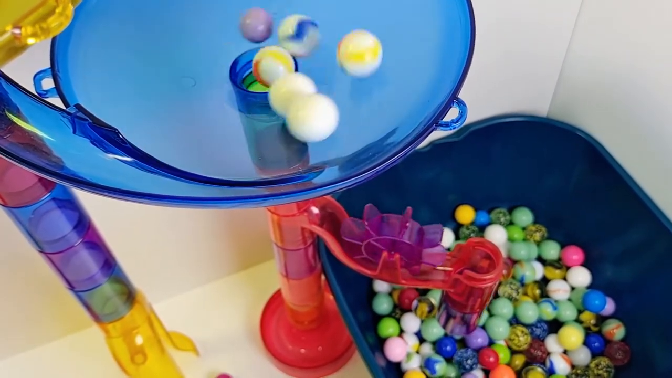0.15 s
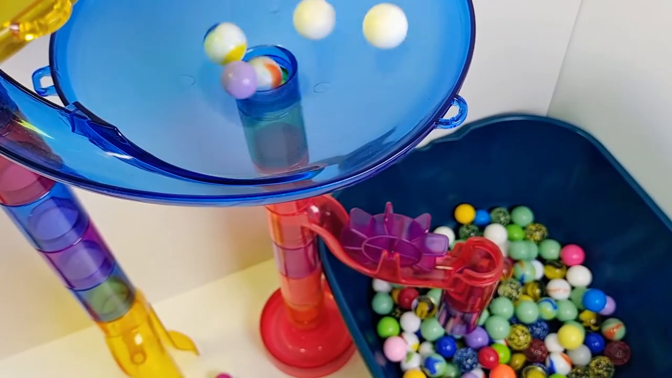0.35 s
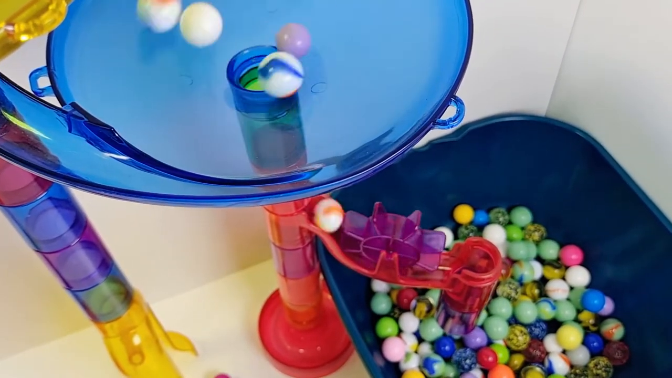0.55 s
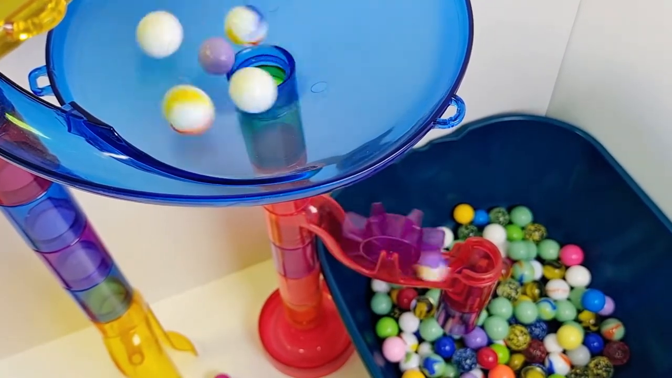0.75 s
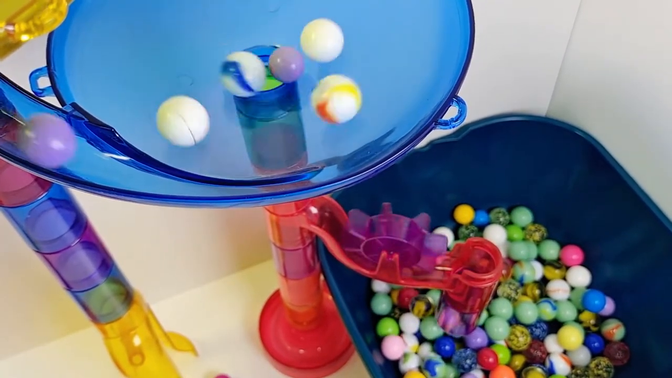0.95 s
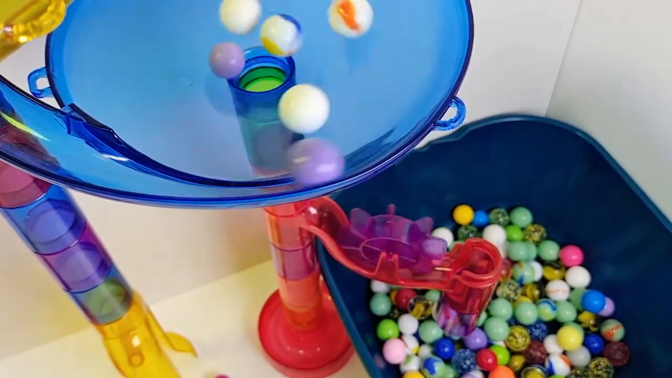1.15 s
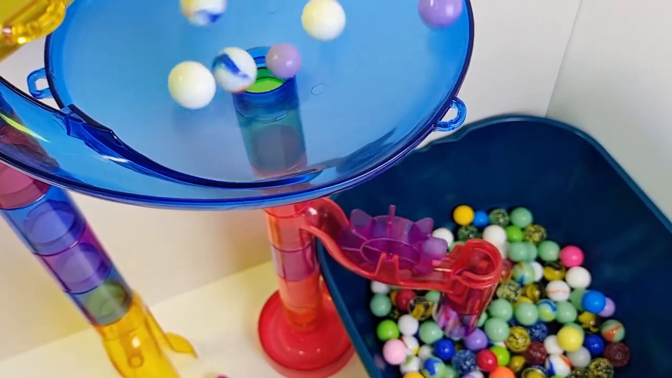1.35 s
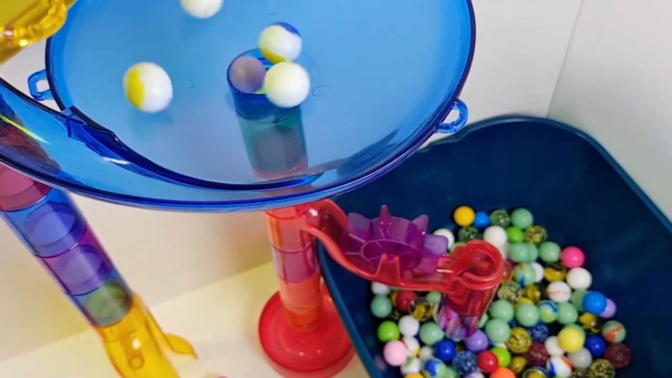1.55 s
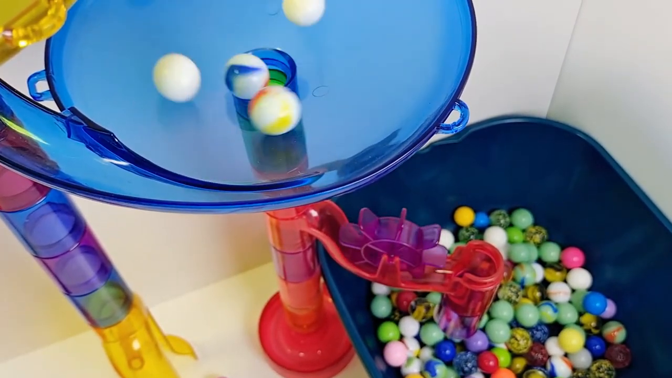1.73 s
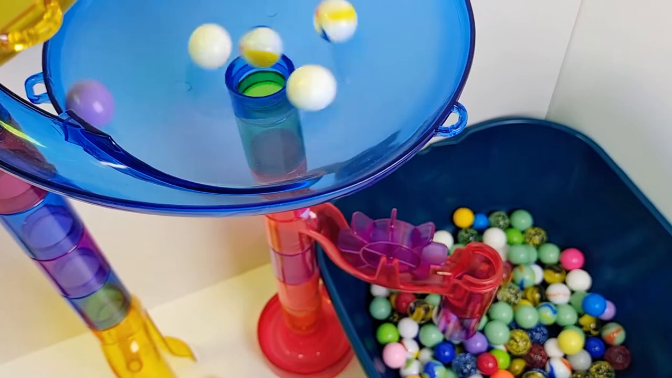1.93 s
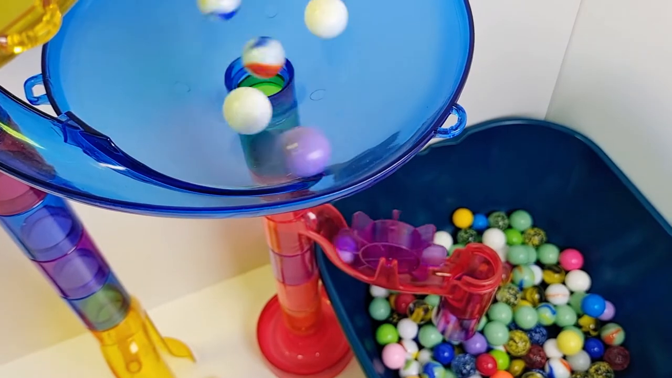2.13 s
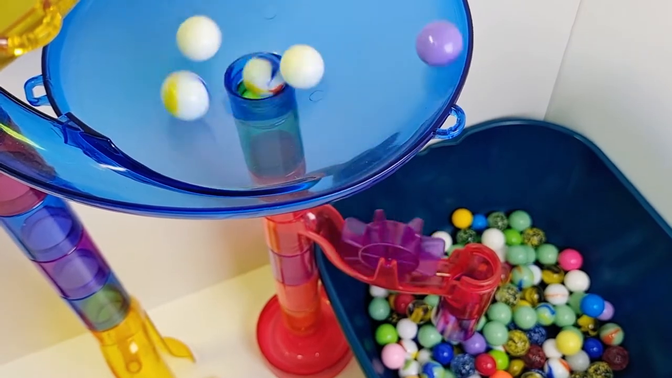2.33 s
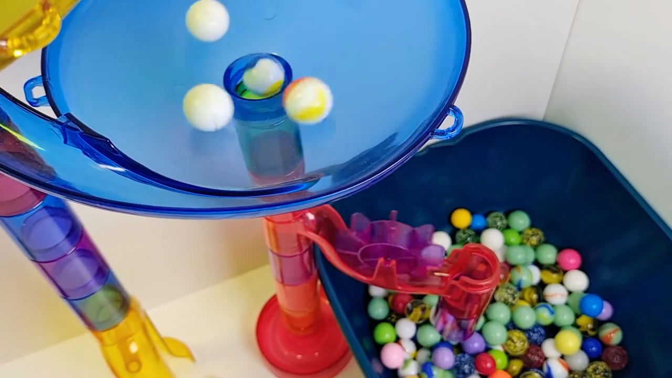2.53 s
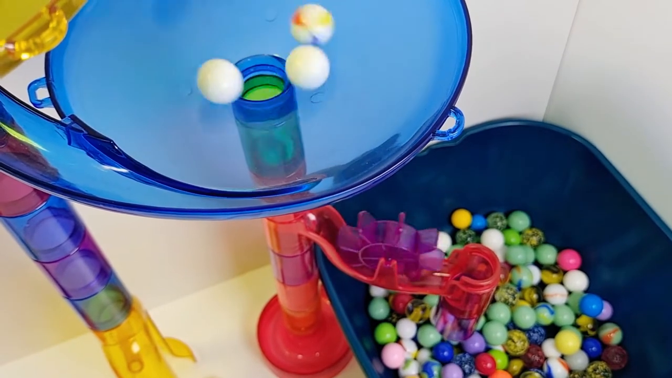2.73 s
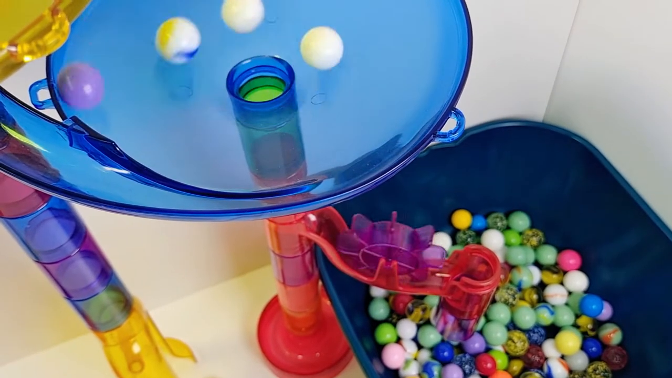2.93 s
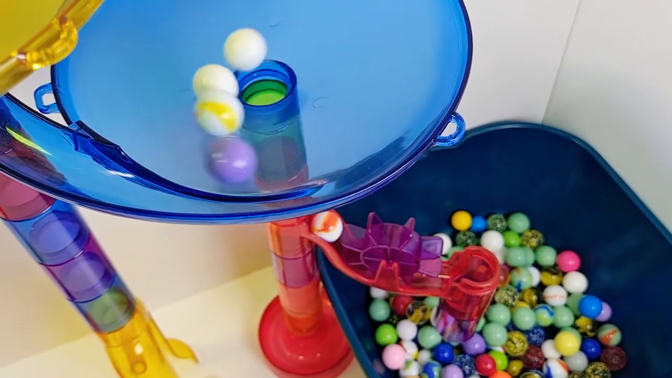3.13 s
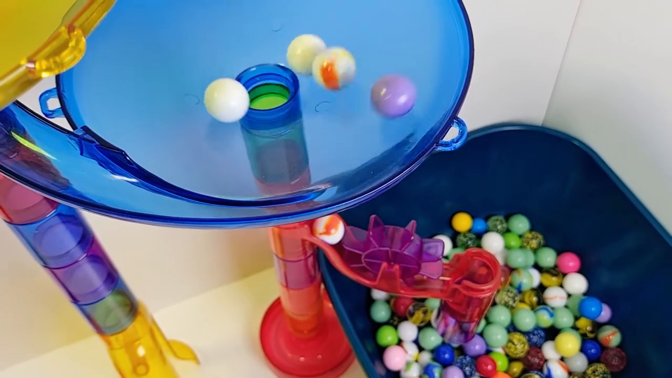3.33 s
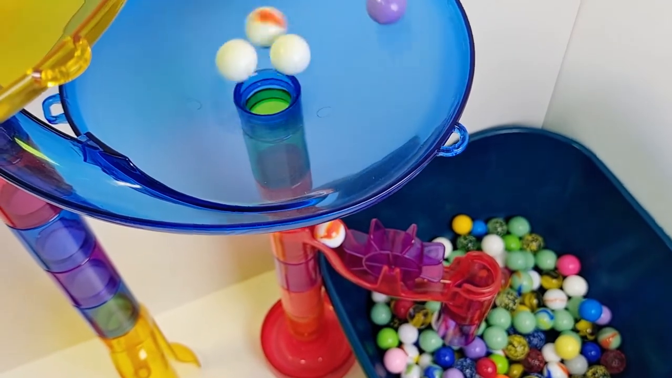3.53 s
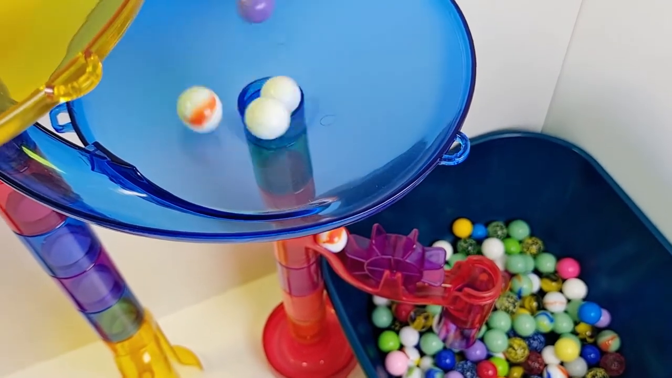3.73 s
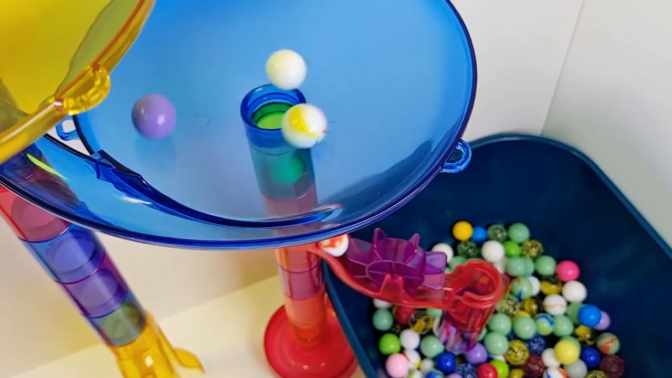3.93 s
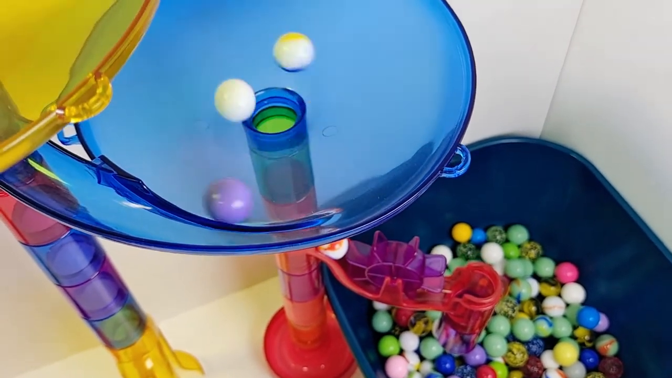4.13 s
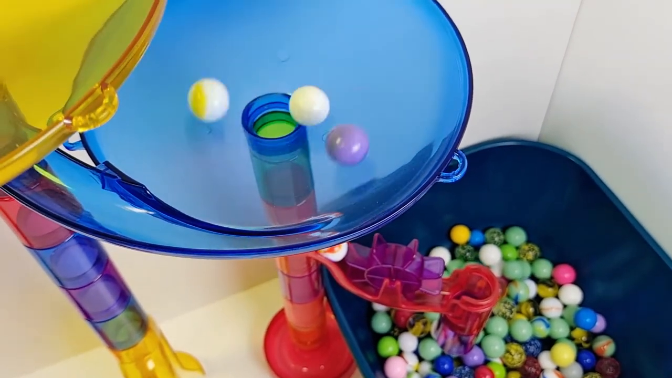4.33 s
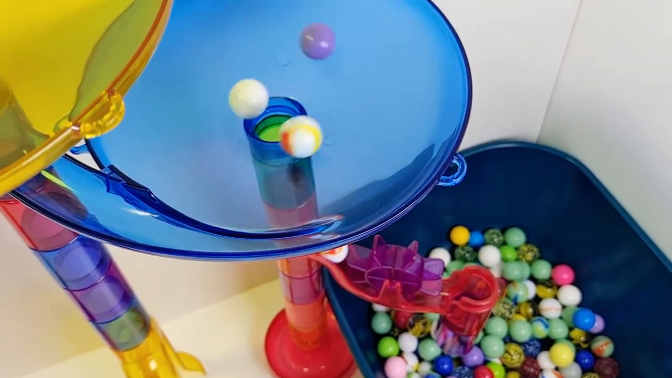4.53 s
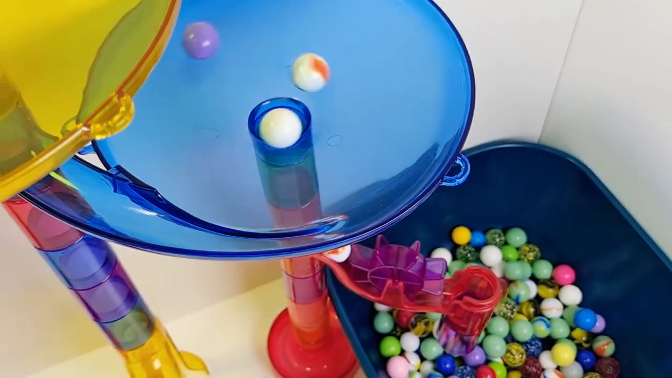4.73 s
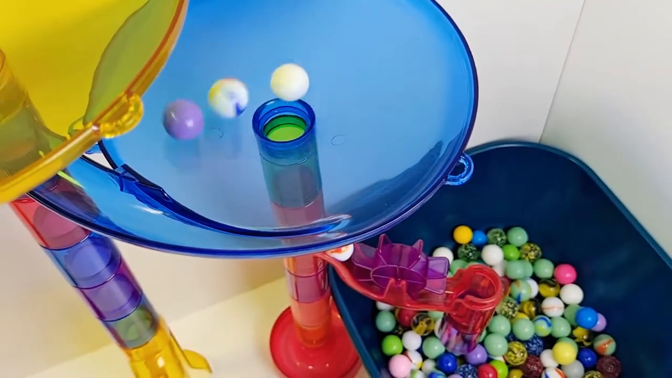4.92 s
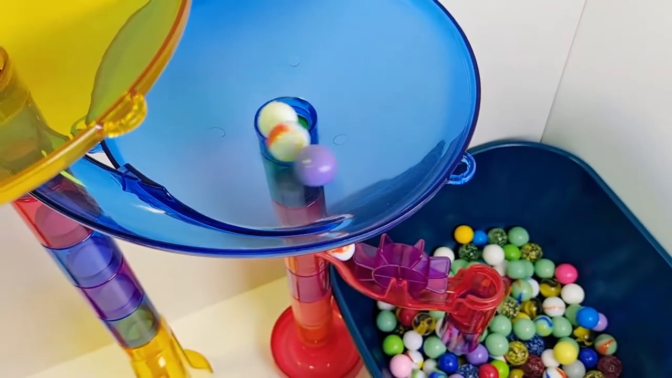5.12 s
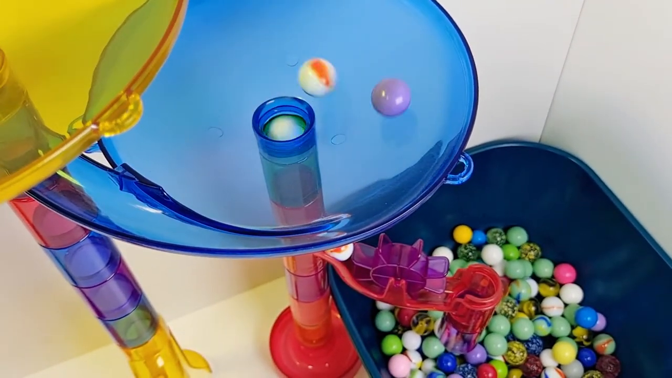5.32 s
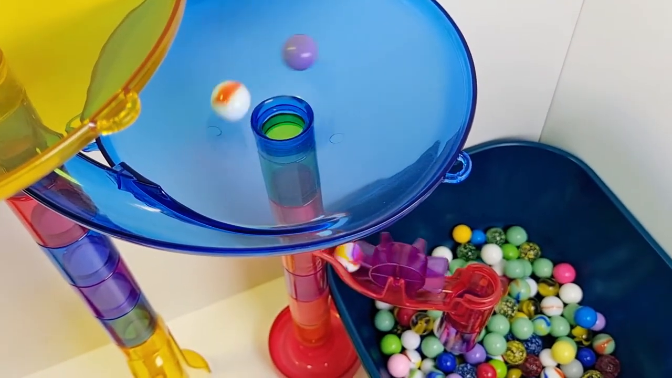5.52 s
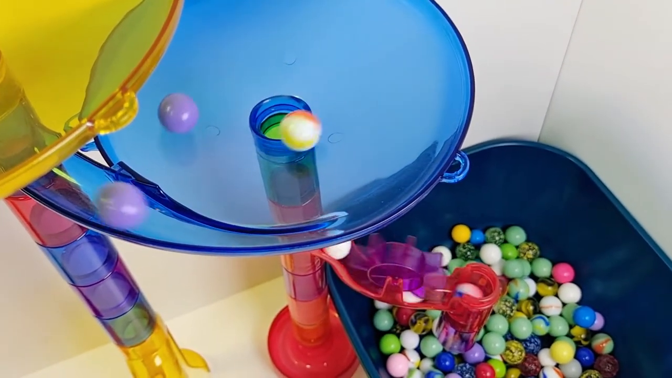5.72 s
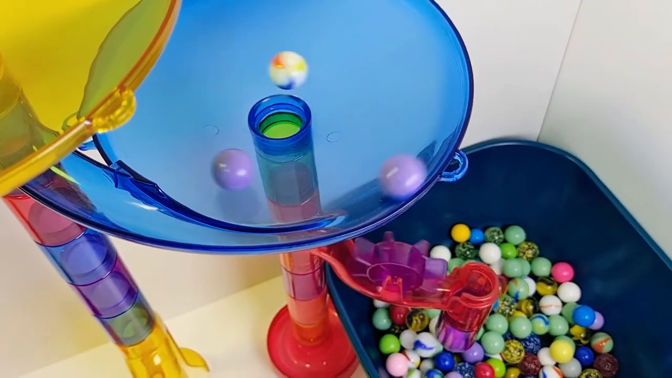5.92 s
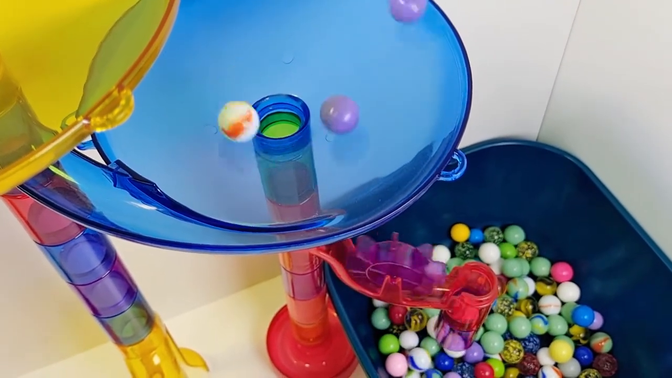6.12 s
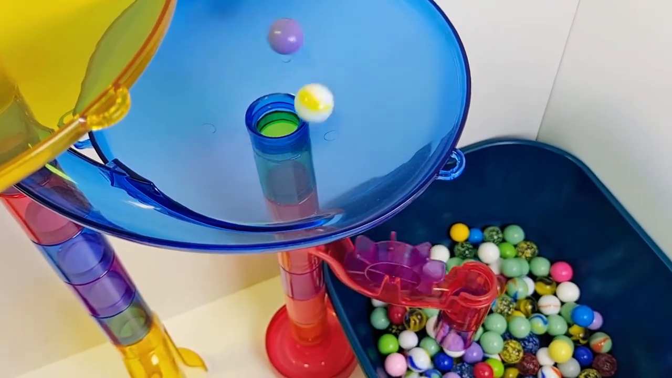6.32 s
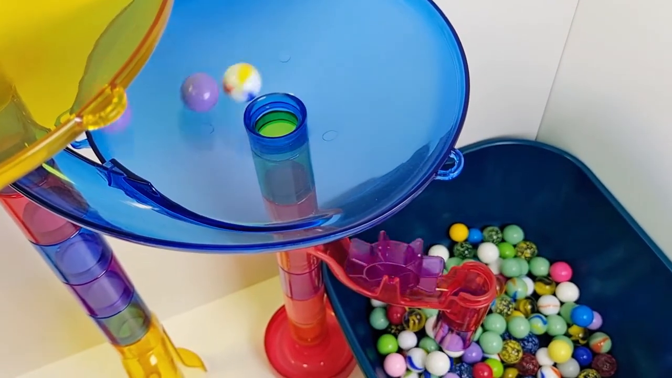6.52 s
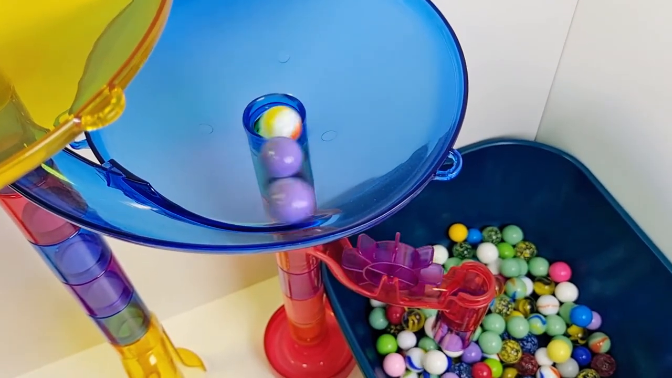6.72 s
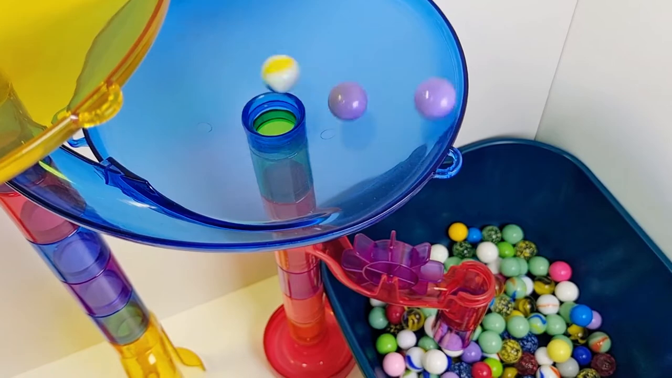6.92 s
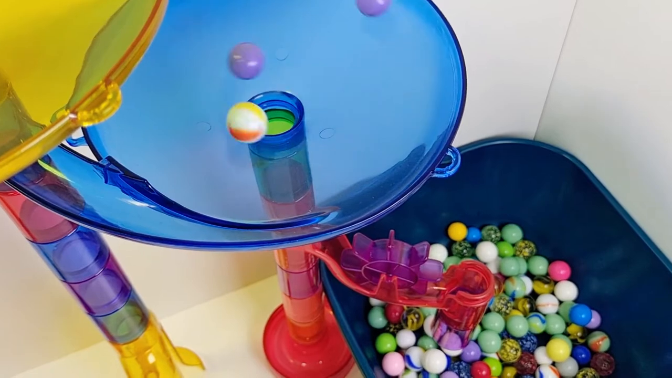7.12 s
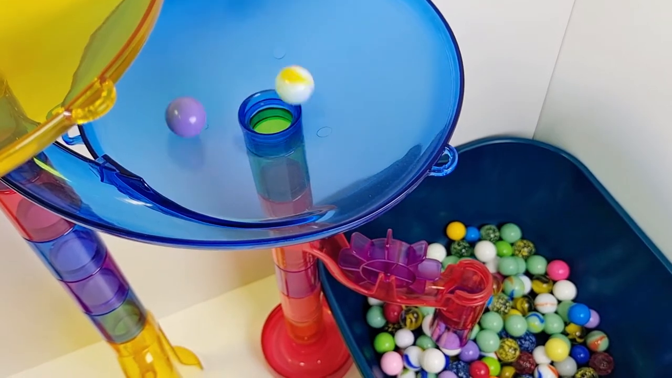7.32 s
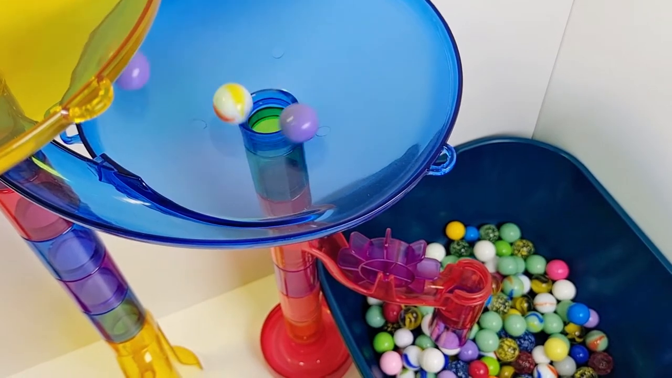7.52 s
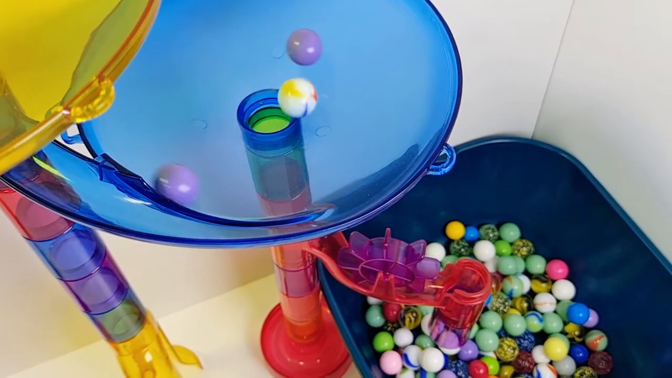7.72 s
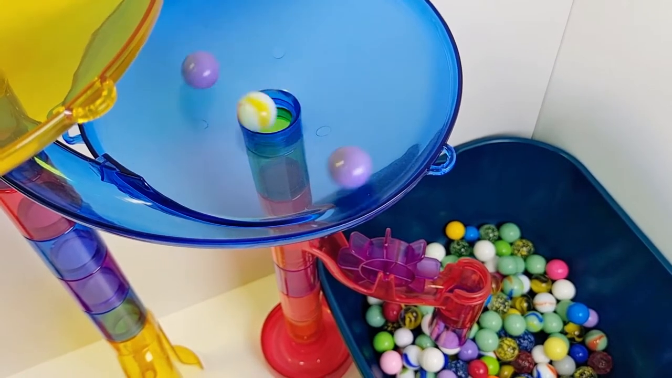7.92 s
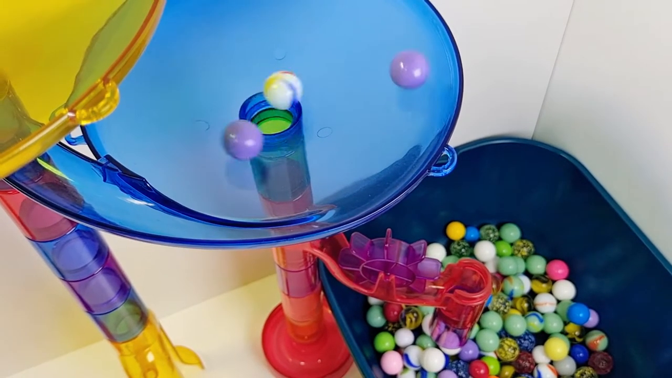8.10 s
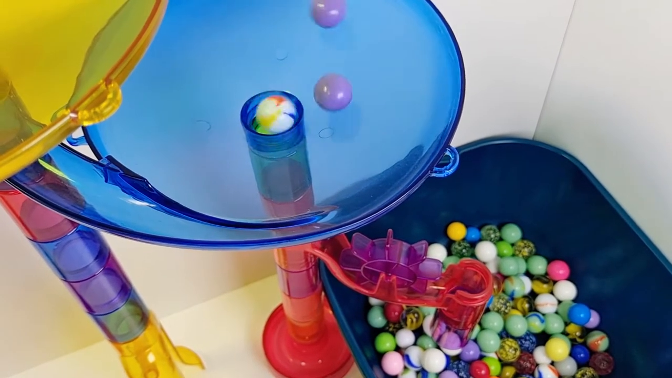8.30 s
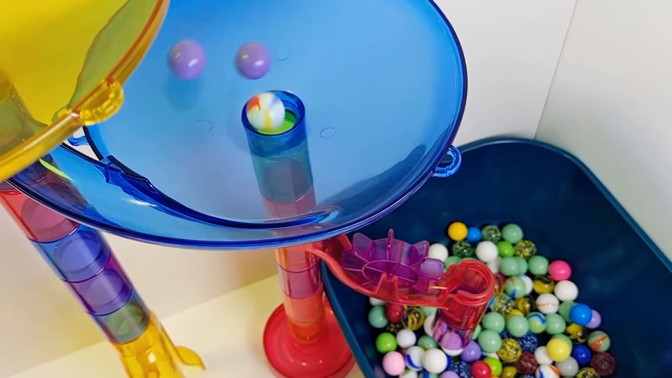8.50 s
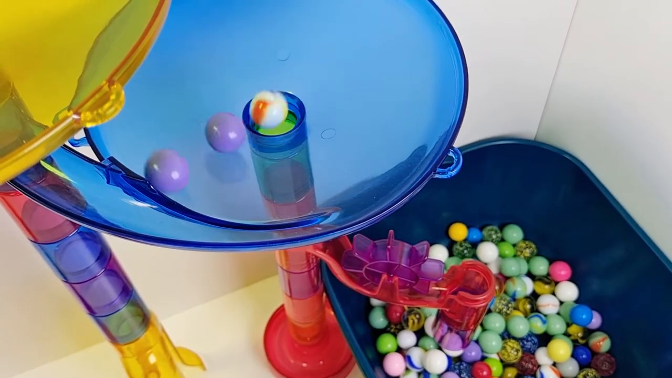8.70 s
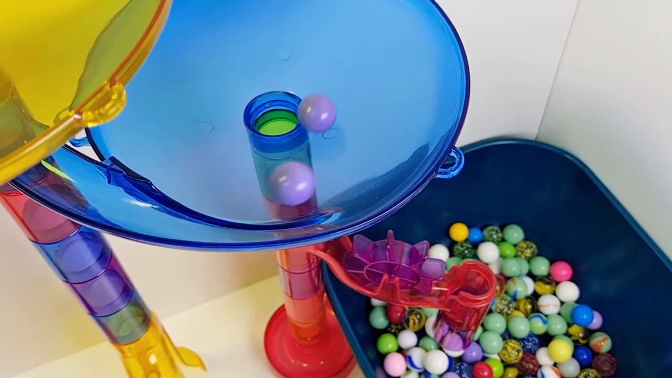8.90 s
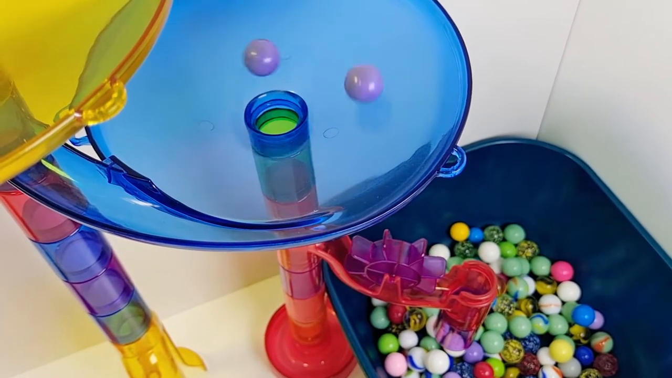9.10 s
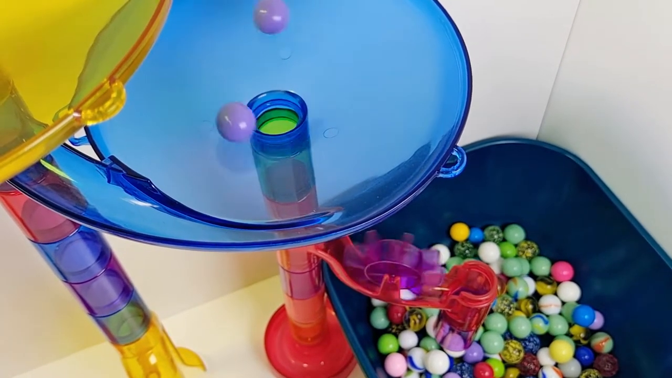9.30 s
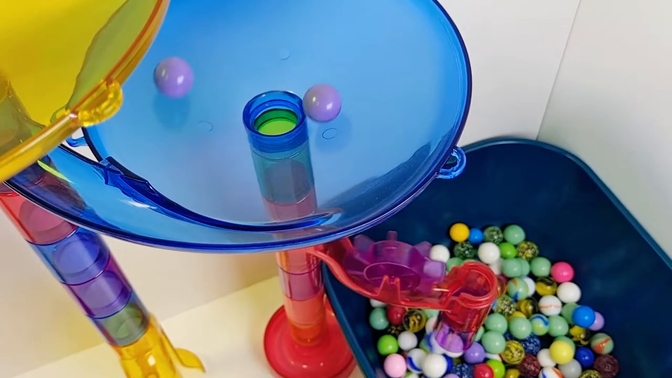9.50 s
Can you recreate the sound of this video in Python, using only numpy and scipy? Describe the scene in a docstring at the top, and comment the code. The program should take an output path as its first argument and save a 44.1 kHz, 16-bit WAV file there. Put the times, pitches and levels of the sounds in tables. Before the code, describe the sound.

Close, wide stereo in a small quiet room. Glass marbles roll continuously round thin plastic funnels, a hollow grainy whirr with a light scrape, wavering in level. At about 0.5 s one drops: quick hard clacks down the tube and track, landing in the tub of marbles near 1.1 s. Rolling continues, then a second rattle at 1.9-2.2 s and a solid landing at 2.6 s. At 2.9-3.3 s comes a heavier hollow clatter with a low tower boom. Small knocks follow around 4.1-4.3 s. From 5.5 to 6.4 s a longer run knocks along the track, clinks, and lands in several clacks. From 6.6 to 8.3 s mostly soft rolling with faint nudges; a slight drone spins at 8.4-8.8 s. At 9.0-9.4 s a last sharp drop booms, rattles and settles among glass, with rolling still going afterwards.

```python
"""A small room: glass marbles circle in the plastic funnels of a marble run, close by.
They rattle down tubes, knock on track and ramp, and drop into a tub of marbles.
Rolling is dense random contacts through funnel resonances; the tower booms softly under it.
Each blow is damped modes over short coloured noise; glass clicks are high resonant noise."""
import sys
import numpy as np
from scipy import signal
from scipy.fft import rfft, irfft, next_fast_len
from scipy.io import wavfile
from scipy.ndimage import map_coordinates

SR = 44100
rng = np.random.default_rng(int(sys.argv[2]) if len(sys.argv) > 2 else 0)


def int16_out(signal):
    """Quantize to a 16-bit WAV file."""
    q = np.round(np.clip(np.atleast_2d(signal).T, -1, 1) * 32767)
    wavfile.write(sys.argv[1], SR, q.astype(np.int16))


N = 421155

# Marbles circling. Each row: time in seconds, funnel rolling level in dB, treble scrape level in dB,
# both before the layer gains.
CIRCLING = [(0, -39, -50), (0.3, -35.5, -47), (0.45, -31, -41.5), (1.27, -38, -55), (1.68, -35.5, -63),
            (1.83, -36.5, -48.5), (2.2, -35.5, -54), (2.43, -32, -53), (2.76, -36, -53),
            (3.42, -41.5, -56.5), (3.72, -40.5, -67), (3.95, -40.5, -48.5), (4.2, -39, -45),
            (4.47, -39, -57), (4.72, -42.5, -64.5), (4.99, -36.5, -54), (5.05, -44.5, -63),
            (5.1, -37.5, -52), (5.17, -40.5, -58.5), (5.36, -38.5, -45), (5.7, -31.5, -37.5),
            (6.27, -39, -56), (6.62, -36, -58), (6.92, -39.5, -62), (7.2, -41.5, -67), (7.33, -37, -63.5),
            (7.48, -42, -68.5), (7.75, -38.5, -63), (8.08, -38.5, -58.5), (8.22, -43.5, -64),
            (8.3, -38.5, -57), (8.52, -34, -56.5), (8.78, -39, -62), (8.93, -30.5, -47.5),
            (9.55, -37.5, -47.5)]
# Marbles leave the funnel and run down the track. Each row: start in seconds, spin-up time in seconds,
# run length in seconds, rattle level in dB, funnel shaking level in dB, both before the layer gains.
RUNS = [(0.57, 0.021, 0.24, -30, -37.5), (1.95, 0.053, 0.16, -40.5, -49.5), (2.891, 0.46, 0.31, -38, -37.5),
        (4.08, 0.19, .25, -45, -53), (5.58, 0.14, .42, -38, -48.5), (6.332, 0.29, 0.23, -46, -59.5),
        (9.059, 0.069, .17, -33.5, -36)]
# Tower boom. Each row: time in seconds, level in dB.
BOOM_LEVEL = [(0, -51), (.3, -49.5), (.52, -34), (.8, -36), (.92, -46.5), (1.85, -52), (1.97, -38.5),
              (2.3, -53), (2.57, -42), (2.72, -44.5), (2.95, -30.5), (3.27, -40.5), (3.42, -53),
              (3.76, -60), (4.17, -39), (4.55, -61), (5.3, -53.5), (5.5, -39), (6.03, -42.5), (6.25, -48.5),
              (6.9, -56), (8.1, -59), (8.55, -46.5), (8.87, -56), (9.07, -30.5), (9.27, -32), (9.55, -51)]

# Blows: levels are before the register trims.
# Marble on track. Each row: start in seconds, level in dB, ring in Hz, clack in dB re the level.
KNOCKS = [(0.094, -36.5, 1490, -2.5), (0.1908, -21, 1390, -15.5), (0.5007, -20.5, 1420, -15),
          (0.516, -24.5, 1410, -10.5), (0.548, -18.5, 1620, -28.5), (0.5716, -7, 1630, -17.5),
          (0.6949, -11.5, 1470, -16.5), (0.7305, -26, 1900, -8), (0.7746, -9.5, 1410, -11),
          (0.815, -19, 1390, -13.5), (0.8512, -20.5, 1560, -17.5), (0.947, -9, 2170, -12),
          (1.0093, -22, 1445, -16), (1.7939, -31, 1640, -10), (1.881, -29, 1620, -6),
          (1.9217, -24, 1910, -15), (2.0038, -13, 1550, -11), (2.085, -15, 1582, -12),
          (2.1386, -19, 1573, -14.5), (2.191, -36.5, 1400, -6), (2.2197, -23, 1740, -14),
          (2.6786, -19.5, 1600, -8), (2.7694, -20.5, 1580, -19), (2.815, -33, 1800, -10),
          (2.8402, -29, 1860, -8), (3.25, -14, 1580, -12.5), (3.8723, -35.5, 1590, -12),
          (3.9733, -38.5, 1380, 2.5), (4.038, -38.5, 1630, 2.5), (4.0695, -19.5, 1294, -9),
          (4.079, -14.5, 1710, -11), (4.1361, -25, 1550, -11), (4.1712, -16, 1450, -12.5),
          (4.1864, -14, 1285, -12.5), (4.2064, -22, 1850, -4.5), (4.271, -22, 1400, -13),
          (4.3039, -21, 1350, -11), (4.318, -36, 1590, -1), (4.347, -21.5, 1350, -15),
          (5.3097, -32, 1680, -9), (5.3989, -25.5, 1570, -16), (5.5442, -39, 1770, -17.5),
          (5.5685, -12, 1600, -8.5), (5.63, -25, 1400, -6), (5.6476, -18.5, 2270, -7.5),
          (5.673, -14, 1590, -11.5), (5.6885, -17, 1740, -8), (5.7169, -14, 1400, -10),
          (5.751, -14, 1430, -13), (5.7727, -24.5, 1450, -6.5), (5.8458, -23, 1360, -3),
          (5.874, -9, 2290, -11.5), (5.8907, -17.5, 1280, -6.5), (5.948, -26.5, 1320, 3),
          (6.3394, -10, 1355, -13.5), (6.4797, -30.5, 1360, -5), (6.581, -24, 1420, -15.5),
          (7.1182, -26, 1420, -21.5), (7.703, -33, 1560, -19), (7.733, -36, 1410, -15),
          (7.9245, -51, 1690, 2.5), (9.006, -22, 1650, -16), (9.032, -36, 1760, -18),
          (9.146, -12.5, 1410, -17), (9.238, -18.5, 1575, -21), (9.306, -23, 1330, -34)]
# Circling marbles jostle softly in the funnel. Each row: start in seconds, level in dB.
NUDGES = [(0.324, -23.5), (3.5669, -29), (5.085, -38), (6.83, -30), (6.9721, -30.5), (6.976, -23.5),
          (7.0059, -29.5), (7.7966, -29), (7.8133, -26.5), (8.2581, -35), (8.304, -27), (8.8945, -24.5)]
# Marble on a stiff rim or neck. Each row: start in seconds, level in dB, ring in Hz.
CLINKS = [(0.562, -23, 4340), (0.6214, -19, 5850), (0.6853, -26, 4680), (0.7414, -19, 5660),
          (0.8044, -27, 3310), (2.0972, -22, 3850), (2.4756, -13.5, 3950), (2.5166, -26, 3950),
          (2.735, -30.5, 4270), (4.086, -25, 3790), (4.1792, -18, 3100), (4.3764, -36.5, 2710),
          (4.667, -44, 3860), (5.5204, -24, 3850), (5.8974, -21.5, 3540), (6.0354, -21.5, 2680),
          (6.0454, -19.5, 4370), (6.1417, -26.5, 4460), (6.234, -19.5, 4230), (6.2484, -28, 3840),
          (6.2608, -26.5, 3880), (9.1044, -20, 3090), (9.1692, -24, 5000)]
# Falling marble on the inside of a tube. Each row: start in seconds, level in dB, clack in dB re the level.
TUBE_HITS = [(0.592, -7, -23), (1.9063, -18.5, -11), (1.943, -18, -7), (1.9472, -8, -11.5),
             (1.9587, -11, -8), (2.8695, -15, -24), (2.889, -9.5, -26), (2.8996, -11, -15.5),
             (2.921, -7, -22), (2.9269, -0.5, -17), (2.937, -3.5, -17), (5.5014, -10.5, -11.5),
             (5.5076, -14, -13.5), (9.0512, -4.5, -22.5), (9.06, -9.5, -19), (9.0982, -5, -18)]
# Marble out of a tube onto the ramp. Each row: start in seconds, level in dB, clack in dB re the level.
RAMP_HITS = [(0.613, -10, -18), (0.635, -7, -17), (2.9624, -4.5, -20.5), (3.0654, -5.5, -19),
             (3.1381, -6.5, -19), (3.1917, -15.5, -38), (3.2184, -17, -24), (4.2535, -15.5, -12),
             (9.1212, -3.5, -18), (9.208, -6, -20), (9.257, -13, -19)]
# Marble on marble. Each row: start in seconds, level in dB, ring in Hz.
CLICKS = [(0.7204, -28.5, 9500), (2.2215, -45, 10800), (2.297, -35, 10200), (3.1385, -31, 14000),
          (5.236, -47, 12000), (5.476, -43, 15000), (5.7735, -29, 8500), (9.06, -23, 7750),
          (9.359, -27, 12400), (9.3734, -26.5, 8900), (9.208, -34, 14000), (8.306, -57, 12300),
          (5.368, -50, 14500), (5.5, -47, 12500)]
# Marble into the tub. Each row: start in seconds, level in dB, ring in Hz, then thud, clack and
# bass thump, each in dB re the level.
DROPS = [(1.057, -7.5, 780, -11, -13.5, -38), (1.0932, -11.5, 790, -14, -23, -37),
         (1.116, -24, 806, -13, -23, -50), (2.5827, -4, 615, -30, -17.5, -49),
         (5.9804, -9.5, 774, -16, -11, -29), (6.0182, -10.5, 753, -17, -20.5, -36),
         (6.08, -12, 814, -21, -13.5, -63), (6.0984, -12.5, 665, -11, -29, -50),
         (6.4248, -11.5, 825, -4.5, -23, -48), (9.358, -23.5, 700, -22, -10.5, -65),
         (9.395, -13.5, 727, -21, -18.5, -33), (9.4164, -18, 692, -11.5, -41, -45)]

# Modes of the track. Each row: frequency in Hz, relative level in dB, t60 in seconds.
TRACK_MODES = [(378, -4, 0.032), (496, -13, 0.047), (680, -2.5, 0.041), (857, -7.5, 0.046),
               (901.6, -3, 0.09), (1028, -15.5, 0.15), (1304, -4.5, 0.064), (1403, 1.5, 0.04),
               (1601, -3.5, 0.084), (1858, 3.5, 0.049), (2255, -17.5, 0.2), (2710, -10, 0.058),
               (3272, -4.5, 0.04), (3910, -2.5, 0.027), (4750, -4.5, 0.034), (5830, -4, 0.034)]
# Modes of the ramp. Each row: frequency in Hz, relative level in dB, t60 in seconds.
RAMP_MODES = [(379, 0.5, 0.083), (860, -2, 0.061), (915, 2.5, 0.048), (1635, 6.5, 0.07), (2376, -2, .04),
              (2690, 4.5, .045), (3430, 8, 0.036), (3590, -0.5, 0.023), (5730, 5.5, .03)]
# Modes of the tub. Each row: frequency in Hz, relative level in dB, t60 in seconds.
TUB_MODES = [(287, -2, 0.045), (378, -1.5, 0.047), (510, 2, 0.053), (600, -3.5, 0.085), (760, -6, 0.093),
             (1226, -1.5, 0.051), (1403, -3.5, 0.047), (1840, -3, 0.036), (2830, -6, 0.032)]
# Resonances of the funnel. Each row: frequency in Hz, width in Hz, relative level in dB.
FUNNEL = [(711, 50, -11), (896.5, 63, -5), (986, 17, -11), (1313, 75, -2.5), (1400, 116, -0.5),
          (1633.5, 57, 0.5), (2276, 29, -15.5)]
# Resonances of the tower. Each row: frequency in Hz, width in Hz, relative level in dB.
TOWER = [(88, 34, -11), (117.8, 13, 1), (161.2, 22, 3.5), (178.6, 60, -8.5)]
# Resonances of the neck's lip. Each row: frequency in Hz, width in Hz, relative level in dB.
LIP = [(891, 63, 1), (1770, 220, -6), (2260, 240, -9.5), (2705, 160, -20)]

# Spectrum of the rolling on the wall. Each row: frequency in Hz, relative level in dB.
ROLL = [(110, -35.5), (180, -8.5), (250, -19), (382, -9.5), (624, -10), (712, -3.5), (798, -11),
        (895, -6.5), (1160, -8.5), (1420, -1.5), (1750, -4), (2000, -11.5), (2300, -17), (2750, -28.5),
        (4000, -35), (9000, -67.5)]
# Spectrum of the treble scrape. Each row: frequency in Hz, relative level in dB.
SCRAPE = [(1500, -4.5), (2700, 2.5), (3100, -4.5), (3600, 1), (4500, -4.5), (5600, -9.5), (8000, -17),
          (10000, -30.5), (14000, -20.5), (16000, -25.5)]
# Spectrum of the rattle and the jostling heap. Each row: frequency in Hz, relative level in dB.
RATTLE = [(50, -58.5), (350, 1.5), (800, 5.5), (1700, 7), (2400, 4.5), (4000, -2), (6000, -7),
          (8000, -11.5), (10000, -22.5), (13000, -19), (16000, -22.5)]
# Blow register, low body. Each row: frequency in Hz, relative level in dB.
THUD = [(20, -100), (50, -63), (100, -39.5), (200, -10.5), (450, -9), (850, 2), (1100, -11.5),
        (1400, -42.5)]
# Blow register, ringing plastic. Each row: frequency in Hz, relative level in dB.
SHELL = [(850, -20.5), (1150, -1.5), (1400, 3.5), (1800, 2), (2300, 5), (3000, -24)]
# Blow register, hard contact. Each row: frequency in Hz, relative level in dB.
CLACK = [(1700, -26), (2400, -7), (3900, -1.5), (5500, -5), (7500, -12.5), (10000, -35.5)]
# Blow register, glass treble. Each row: frequency in Hz, relative level in dB.
TICK = [(5500, -3), (8000, 6), (10000, -0.5), (12500, 6), (15500, 6)]
# Spectrum of the still air. Each row: frequency in Hz, relative level in dB.
HUSH = [(20, -49), (50, 24), (120, 4.5), (400, -14.5), (2000, -29.5), (8000, -45), (16000, -35.5)]
# Stereo likeness. Each row: frequency in Hz, left-right likeness from 0 to 1.
ALIKE = [(100, 0.99), (180, 1), (280, 0.8), (400, 0.86), (520, 0.64), (720, 0.24), (850, 1), (950, .1),
         (1500, 0.21), (4000, 0.04), (12000, 0.15)]
# Room decay. Each row: frequency in Hz, t60 in seconds.
ROOM_T60 = [(150, 0.17), (400, 0.59), (1000, 0.27), (3000, 0.18), (7000, 0.16), (15000, 0.15)]

TOP_HZ = 16050
HIT = SR // 8  # samples per blow
CRACK_DB, CRACK_S = 0, .0025  # extra gain at the instant of contact, and its decay constant
TICK_GROWS = 1.108  # dB of tick per dB of clack
GLINT_LO_HZ, GLINT_HI_HZ, GLINT_DB = 2300, 8000, -2.5  # high modes of the thin walls
CHATTER_S, GLINT_T60_S = .002, .028  # mean delay of the tiny rebounds, t60 of their rings
GLIDE = .021  # scale of the pitch bend, as a share
SPIN_UP_DB, SAG_DB_PER_S, RELEASE_DB_PER_S = 9, 7.5, 104  # rise over the spin-up, slow loss, final extra loss
SHAKE_RISE_DB_PER_S, SHAKE_FALL_DB_PER_S = 69, 62.5
NUDGE_HZ, RAMP_HZ = 1406, 1368
TUBE_HZ, TUBE_SCATTER_HZ = 1785, 40
SPIN_S, SPIN_END_S, SPIN_FADE_S, SPIN_DB = 8.36, 8.8, 0.068, -44


def amp(db):
    """Decibels to gain."""
    return 10 ** (np.asarray(db) / 20)


def unit(x):
    """x at rms 1."""
    return x / np.sqrt(np.mean(x ** 2) + 1e-20)


def along(points, hz):
    """(Hz, value) points read on a log frequency axis."""
    f, v = np.transpose(points)
    return np.interp(np.log(hz + 1), np.log(f), v)


def wobble(rate_hz):
    """Smooth random curve, rate_hz knots a second."""
    knots = rng.standard_normal(int(N * rate_hz / SR) + 4)
    coarse = np.arange(0, N + 64, 64)
    return np.interp(np.arange(N), coarse, map_coordinates(knots, [coarse * rate_hz / SR]))


def filtered(x, response):
    """x times a response of frequency."""
    n = x.shape[-1]
    m = next_fast_len(n + 8192)
    return irfft(rfft(x, m) * response(np.fft.rfftfreq(m, 1 / SR)), m)[..., :n]


def coloured(x, spectrum):
    """x shaped by a (Hz, dB) spectrum, at rms 1."""
    return unit(filtered(x, lambda hz: amp(along(spectrum, hz))))


def resonating(x, peaks):
    """x through (Hz, width Hz, dB) resonances, squared for steep skirts, at rms 1."""
    def response(f):
        total = 0
        for centre, width, db in peaks:
            damping = 1j * f * width
            total = total + amp(db) * (damping / (centre * centre - f * f + damping)) ** 2
        return total
    return unit(filtered(x, response))


def spread(pair):
    """Two unrelated signals become left and right with the ALIKE likeness."""
    def mid_side(hz):
        turn = np.arccos(np.clip(along(ALIKE, hz), -1, 1)) / 2
        return np.array([np.cos(turn), np.sin(turn)])
    mid, side = filtered(pair, mid_side)
    return np.array([mid + side, mid - side])


def add(out, s, x):
    """Mix x into out from time s."""
    part = out[:, round(s * SR):][:, :x.shape[1]]
    part += x[:, :part.shape[1]]


def bumps(rate_hz, scatter_db, t60_s):
    """Tiny contacts at random times and of random sizes, each a decaying noise burst."""
    sizes = (rng.random(N) < rate_hz / SR) * amp(scatter_db * np.clip(rng.standard_normal(N), -2, 2))
    decay = amp(-60 * np.arange(HIT) / SR / t60_s)
    power = signal.fftconvolve(sizes ** 2, decay ** 2)[:N]
    return spread(np.sqrt(np.abs(power)) * rng.standard_normal((2, N)))


def partials(hz, db, t60_s, delay_s):
    """One damped sine per entry, with a phase offset between left and right."""
    t = np.maximum(np.arange(int(.8 * t60_s * SR)) / SR - delay_s[:, None], 0)
    phase = rng.uniform(0, 2 * np.pi, (len(hz), 1)) + rng.standard_normal((2, len(hz), 1))
    envelope = amp(db[:, None] - 60 * t / t60_s) * (1 - np.exp(-t / .0002))
    return envelope * np.sin(2 * np.pi * hz[:, None] * t + phase)


def pings(rate_hz, range_db, lo_hz, hi_hz, t60_s, count=6):
    """Separate small contacts at random times, each ringing count modes of its own; rms 1."""
    draws = rng.random((int(rate_hz * N / SR), 2 + count))  # columns: time, size, modes
    hz = lo_hz * (hi_hz / lo_hz) ** draws[:, 2:].ravel()
    db = np.repeat(-range_db * draws[:, 1], count)
    rings = partials(hz, db, t60_s, np.zeros(1))
    starts = np.repeat(draws[:, 0] * N, count).astype(int)
    at = starts[:, None] + np.arange(rings.shape[2])
    return unit(np.array([np.bincount(at.ravel(), side.ravel(), N)[:N] for side in rings]))


def glints(spectrum, count=8):
    """A marble chatters for an instant as it strikes; each touch rings another high mode."""
    position = (np.arange(count) + rng.random(count)) / count
    hz = GLINT_LO_HZ * (GLINT_HI_HZ / GLINT_LO_HZ) ** position
    db = GLINT_DB + along(spectrum, hz) + 3 * rng.standard_normal(count)
    return partials(hz, db, GLINT_T60_S, rng.exponential(CHATTER_S, count)).sum(axis=1)


def contact(s, level_db, ring_hz, clack_db, thud_db, tick_db):
    """One blow with its register levels: a harder contact has more clack, and tick follows clack."""
    return s, level_db, ring_hz, thud_db, clack_db, tick_db + TICK_GROWS * clack_db


def blows(hits, modes, ring_db, ring_t60_s, modal_db, vary_db, attack_s, trims_db, t60s_s):
    """Each blow rings clear modes over a noise crowd of short ones, in four separately levelled registers."""
    out, t = np.zeros((2, N)), np.arange(HIT) / SR
    attack = (1 - np.exp(-t / attack_s)) * (1 + amp(CRACK_DB) * np.exp(-t / CRACK_S))
    pan_db = 0.4 + 0.68 * rng.standard_normal(len(hits))  # left minus right: each lands elsewhere
    for register, spectrum in enumerate([THUD, SHELL, CLACK, TICK]):
        crowd = coloured(spread(rng.standard_normal((2, SR + HIT))), spectrum)
        for number, (s, level_db, ring_hz, thud_db, clack_db, tick_db) in enumerate(hits):
            hz, db, life_s = np.transpose([*modes, (ring_hz, ring_db, ring_t60_s)])
            db = modal_db + db + along(spectrum, hz) + vary_db * rng.standard_normal(len(hz))
            phase = rng.uniform(0, 2 * np.pi, len(hz)) + rng.normal(0, 0.48, (2, len(hz)))
            blow = crowd[:, rng.integers(SR):][:, :HIT] * amp(-60 * t / t60s_s[register])
            for k in np.flatnonzero(along(spectrum, hz) > -15):
                sine = np.sin(2 * np.pi * hz[k] * t + phase[:, k, None])
                blow = blow + amp(db[k] - 60 * t / life_s[k]) * sine
            if spectrum is CLACK:
                add(blow, 0, glints(spectrum))
            blow = blow * attack * amp(pan_db[number] * np.array([[.5], [-.5]]))
            strength = np.sqrt(np.mean(blow[:, :SR // 50] ** 2))  # rms of the first 20 ms
            gain_db = level_db + trims_db[register] + (thud_db, 0, clack_db, tick_db)[register]
            add(out, s, blow / strength * amp(gain_db))
    return out


def circling_db():
    """Level of the funnel rolling at each sample."""
    s, level_db, _ = np.transpose(CIRCLING)
    return np.interp(np.arange(N) / SR, s, level_db)


def gliding(x):
    """x with its pitch bending slowly, as the marbles' weight moves round the wall."""
    n = np.arange(N)
    bent = n + np.cumsum(GLIDE * wobble(5))
    return np.array([np.interp(bent % N, n, side) for side in x])


def rolling(shaking):
    """Marbles ride over tiny bumps that ring the funnel, louder while a run shakes it."""
    level = np.hypot(amp(circling_db()), amp(2.5) * shaking)
    wall = coloured(bumps(rate_hz=450, scatter_db=6.5, t60_s=0.055), ROLL)
    contacts = bumps(rate_hz=900, scatter_db=6.5, t60_s=0.0032)
    ring = np.zeros((2, N))
    for hz, width_hz, db in FUNNEL:
        # circling marbles cross each mode's nodes: its level wanders on its own
        mode_gain = amp(db + 2.1 * wobble(6))
        ring += mode_gain * gliding(resonating(contacts, [(hz, width_hz, 0)]))
    body = amp(-0.16) * level * unit(wall + amp(-0.5) * unit(ring))

    s, _, treble_db = np.transpose(CIRCLING)
    fine = unit(bumps(rate_hz=800, scatter_db=3.5, t60_s=0.06))
    grains = pings(rate_hz=45, range_db=12, lo_hz=1500, hi_hz=7000, t60_s=.008, count=12)
    scrape_gain = amp(np.interp(np.arange(N) / SR, s, treble_db) + 1.2 * wobble(9.9))
    scrape = scrape_gain * coloured(fine + amp(-9) * grains, SCRAPE)
    flutter = amp(1.2 * wobble(16))
    return flutter * (body + amp(2.5) * scrape)


def running():
    """Rattle and funnel shaking gains: each run swells into the neck, sags as it loses speed, dies away."""
    t, rattle_power, shaking_power = np.arange(N) / SR, np.zeros(N), np.zeros(N)
    for s, spin_up_s, length_s, rattle_db, shaking_db in RUNS:
        early_s, since_s, late_s = np.maximum([s - t, t - s, t - s - length_s], 0)
        sag_db = SAG_DB_PER_S * since_s
        swell_db = SPIN_UP_DB * early_s / spin_up_s
        rattle_power += amp(rattle_db - swell_db - sag_db - RELEASE_DB_PER_S * late_s) ** 2
        shake_edges_db = SHAKE_RISE_DB_PER_S * early_s + SHAKE_FALL_DB_PER_S * late_s
        shaking_power += amp(shaking_db - sag_db - shake_edges_db) ** 2
    return np.sqrt(rattle_power), np.sqrt(shaking_power)


def descent(rattle):
    """In the tubes marbles skip and touch each other; low tower resonances boom under random contacts."""
    boom = amp(np.interp(np.arange(N) / SR, *np.transpose(BOOM_LEVEL)))
    skips = pings(rate_hz=70, range_db=22, lo_hz=1100, hi_hz=6500, t60_s=.022)
    chatter = unit(coloured(bumps(rate_hz=280, scatter_db=13.5, t60_s=0.053), RATTLE) + skips)
    touches = coloured(bumps(rate_hz=100, scatter_db=11, t60_s=0.03), TICK)
    tower = resonating(bumps(rate_hz=120, scatter_db=1.5, t60_s=0.013), TOWER)
    return amp(2.5) * rattle * (chatter + amp(-18) * touches) + boom * tower


def knocks():
    """Glass on thin hard plastic: short and bright."""
    hits = [contact(*row, thud_db=-12.5, tick_db=-2.5) for row in KNOCKS]
    return blows(hits, TRACK_MODES, ring_db=4.0, ring_t60_s=0.073, modal_db=-1.5, vary_db=5.0,
                 attack_s=0.0018, trims_db=(-4.0, -12.5, -2, -2.5), t60s_s=(0.076, 0.14, 0.055, 0.05))


def nudges():
    """Slow contacts ring the funnel with little clack and hardly any tick."""
    hits = [contact(s, level_db, NUDGE_HZ, clack_db=-19.5, thud_db=-13.5, tick_db=-21)
            for s, level_db in NUDGES]
    return blows(hits, TRACK_MODES, ring_db=15.5, ring_t60_s=0.036, modal_db=1.5, vary_db=9.0,
                 attack_s=0.0025, trims_db=(-1.0, -7.0, 0.5, -14), t60s_s=(0.025, 0.064, 0.045, 0.03))


def clinks():
    """Stiff rims and necks ring high, with one dominant note."""
    hits = [contact(*row, clack_db=-6.0, thud_db=-15.0, tick_db=-6.0) for row in CLINKS]
    return blows(hits, TRACK_MODES, ring_db=22.0, ring_t60_s=.048, modal_db=-15.0, vary_db=3.0,
                 attack_s=0.00095, trims_db=(-1.5, -15.5, -2.5, -5.0), t60s_s=(0.061, 0.039, 0.059, 0.04))


def tube_hits():
    """The short tube answers with one hollow note, slightly different for each hit."""
    notes_hz = TUBE_HZ + TUBE_SCATTER_HZ * rng.standard_normal(len(TUBE_HITS))
    hits = [contact(s, level_db, hz, clack_db, thud_db=-14.5, tick_db=-1.0)
            for (s, level_db, clack_db), hz in zip(TUBE_HITS, notes_hz)]
    return blows(hits, TRACK_MODES, ring_db=9.0, ring_t60_s=.045, modal_db=1.0, vary_db=1.5,
                 attack_s=.0009, trims_db=(-8.0, -15.0, -3, -7.0), t60s_s=(0.18, 0.021, 0.096, 0.1))


def ramp_hits():
    """The ramp, struck at one spot, answers with nearly the same hollow chord each time."""
    hits = [contact(s, level_db, RAMP_HZ, clack_db, thud_db=-10, tick_db=-1.5)
            for s, level_db, clack_db in RAMP_HITS]
    return blows(hits, RAMP_MODES, ring_db=14, ring_t60_s=0.02, modal_db=-1.0, vary_db=2.0,
                 attack_s=.0015, trims_db=(-4.0, -13.0, -3.5, 0.0), t60s_s=(0.042, 0.045, 0.05, 0.05))


def clicks():
    """Glass on glass: a very high, short ring with no body."""
    out, t = np.zeros((2, N)), np.arange(HIT) / SR
    for s, db, hz in CLICKS:
        snap = resonating(rng.standard_normal((2, HIT)), [(hz, 900, 0), (14500, 3500, -9)])
        add(out, s, amp(db - 60 * t / .05) * snap)
    return out


def drops():
    """A falling marble thumps the tub, and the heap jostles for a moment afterwards."""
    hits = [contact(s, level_db, hz, clack_db, thud_db, tick_db=-1.0)
            for s, level_db, hz, thud_db, clack_db, _ in DROPS]
    landing = blows(hits, TUB_MODES, ring_db=9.5, ring_t60_s=.07, modal_db=1.5, vary_db=2,
                    attack_s=.0012, trims_db=(-1.5, -12.5, -2.5, 5.0), t60s_s=(0.05, 0.079, 0.057, 0.073))
    unrest, heave, t = np.zeros((1, N)), np.zeros((1, N)), np.arange(SR // 2) / SR
    for s, level_db, _, _, clack_db, thump_db in DROPS:
        add(unrest, s, amp(level_db + clack_db - 60 * t / 0.23)[None] * (1 - np.exp(-t / 0.0083)))
        add(heave, s, amp(level_db + thump_db - 60 * t / 0.2)[None] * (1 - np.exp(-t / .006)))
    jostle = unrest * coloured(bumps(rate_hz=200, scatter_db=2.0, t60_s=0.22), RATTLE)
    soft_floor = resonating(spread(rng.standard_normal((2, N))), [(63.6, 33, 0)])
    return landing + amp(5.5) * jostle + amp(3.5) * heave * soft_floor


def spinning():
    """A marble whirling on the lip of the neck sets it droning."""
    t = np.arange(N) / SR
    outside_s = np.maximum(np.maximum(SPIN_S - t, t - SPIN_END_S), 0)
    gain = amp(SPIN_DB + 1.3 * wobble(6)) * np.exp(-outside_s / SPIN_FADE_S)
    return gain * resonating(bumps(rate_hz=590, scatter_db=4.5, t60_s=0.0039), LIP)


def room(x):
    """The walls answer with decaying noise; the marbles move on, so each third of a second has its own tail."""
    out, step = np.zeros((2, N)), SR // 3
    for start in range(0, N, step):
        hz, t, z = signal.stft(spread(rng.standard_normal((2, SR // 2))), SR, nperseg=256)
        decay = amp(-60 * t / along(ROOM_T60, hz)[:, None]) * (1 - np.exp(-t / 0.00076))
        tail = signal.istft(z * decay, SR, nperseg=256)[1]
        tail = tail / np.linalg.norm(tail[0])
        add(out, start / SR, signal.fftconvolve(x[:, start:start + step], tail, axes=1))
    return out


def scene():
    """The run, its room and the still air; sound reaches the right a little sooner."""
    rattle, shaking = running()
    run = rolling(shaking) + descent(rattle) + knocks() + nudges() + clinks() + tube_hits()
    run = run + ramp_hits() + clicks() + drops() + spinning()
    air = coloured(spread(rng.standard_normal((2, N))), HUSH)
    sound = run + amp(-8.0) * room(run) + amp(-67.0) * air
    lag_s = .00009
    # Each row: frequency in Hz, left minus right in dB.
    lean = [(250, -.5), (1000, .8), (2000, .1), (5000, 1.5), (8500, -2.5), (14000, -2.8)]

    def placement(hz):
        return np.array([amp(side * along(lean, hz) / 2) * np.exp(-1j * np.pi * side * hz * lag_s)
                         for side in (1, -1)])
    return filtered(sound, placement)


def record(dry):
    """Soft saturation rounds the highest peaks; a steep low-pass limits the band."""
    rounded = dry / (1 + (np.abs(dry) / .85) ** 4) ** (1 / 4)
    return filtered(rounded, lambda hz: 1 / np.sqrt(1 + (hz / TOP_HZ) ** 200))


dry = scene()
out = record(dry)
int16_out(out)
```